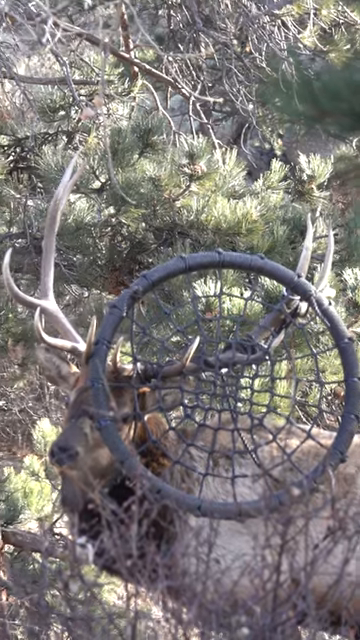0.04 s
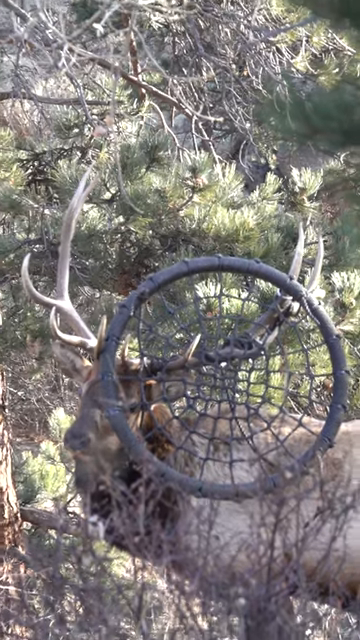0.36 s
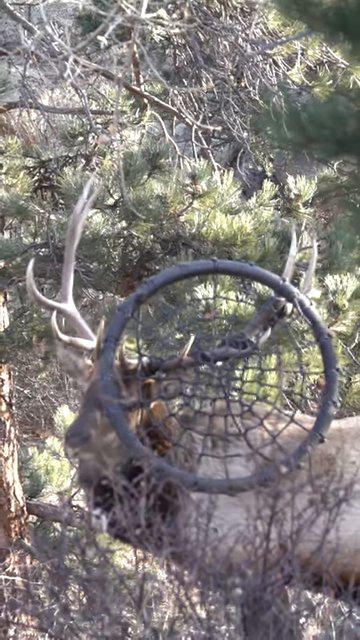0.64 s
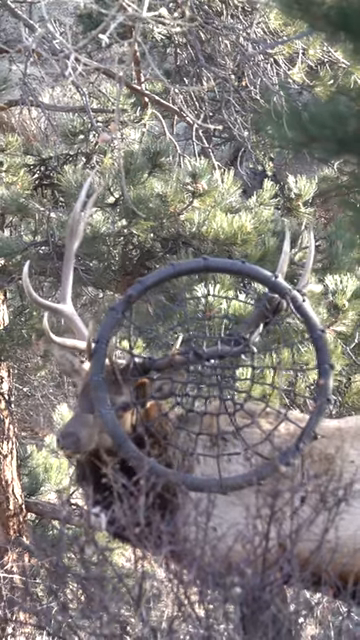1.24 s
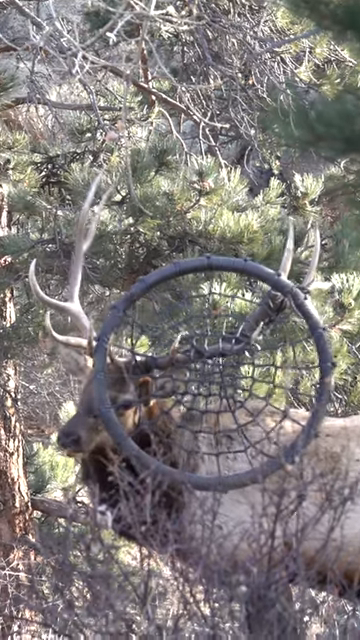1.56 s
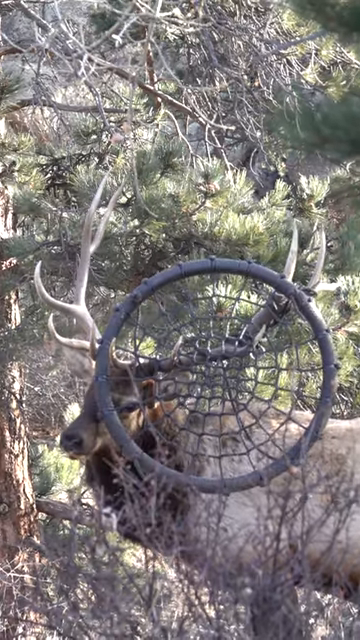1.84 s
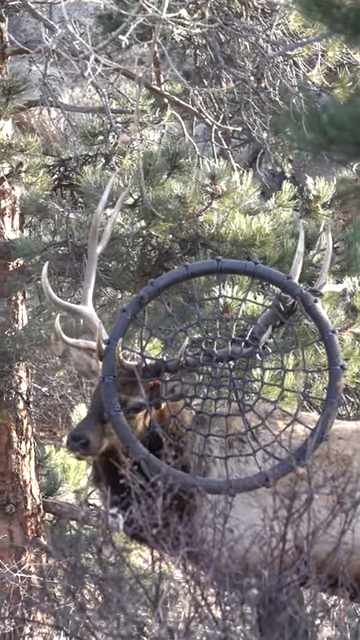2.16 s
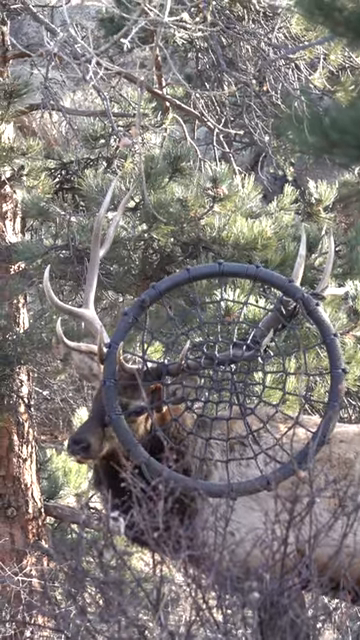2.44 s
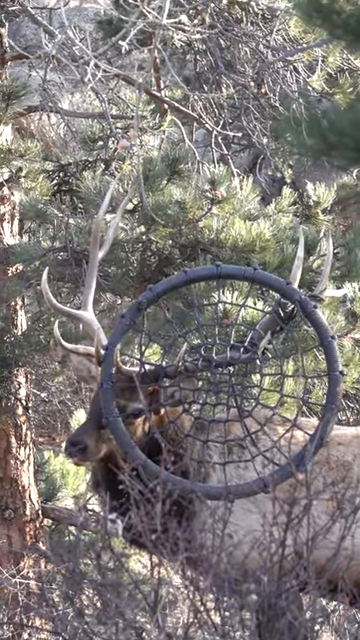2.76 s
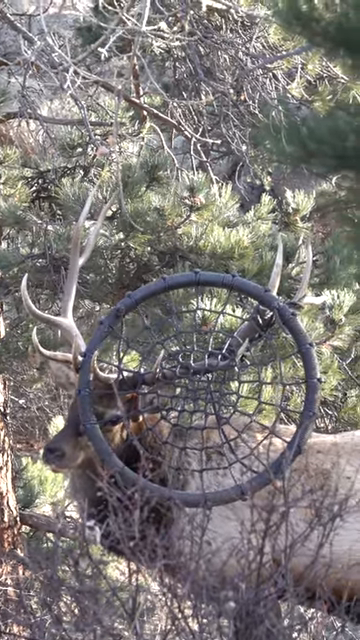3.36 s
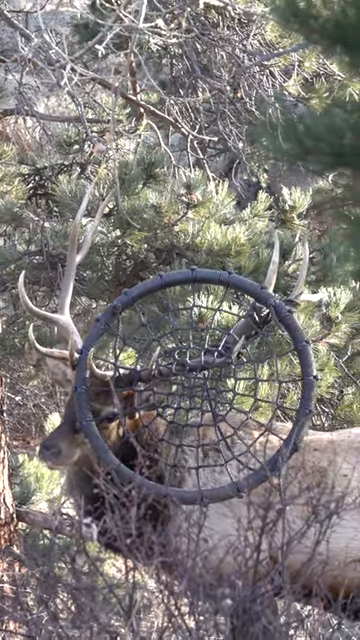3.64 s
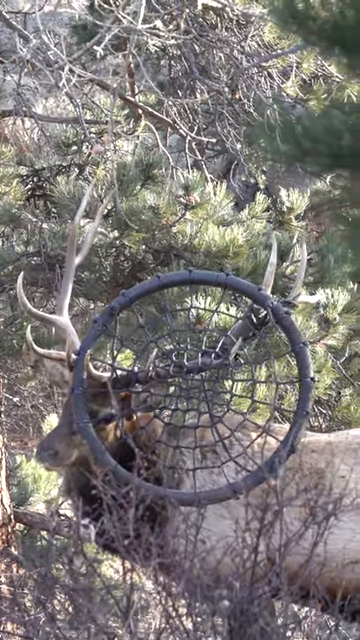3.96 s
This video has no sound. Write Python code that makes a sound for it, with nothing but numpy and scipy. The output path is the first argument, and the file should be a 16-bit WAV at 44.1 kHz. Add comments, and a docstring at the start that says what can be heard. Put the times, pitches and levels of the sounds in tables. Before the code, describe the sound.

Far-off propeller plane droning and sinking in pitch, under close camera handling bumps.

```python
"""Distant plane over a pine wood

A propeller plane drones far away. Its pitch sinks as it passes (the Doppler effect),
and its roar swells in the moving air. Close by, a hand-held camera rumbles and takes
soft low bumps, its casing ticks, a finger slides on it, and its zoom motor whirrs for
the first half second. Small birds chip very faintly over a thin, even hiss."""
import sys
import numpy as np
from scipy import signal
from scipy.fft import rfft, irfft
from scipy.io import wavfile
from scipy.ndimage import uniform_filter1d, map_coordinates

SR = 44100
rng = np.random.default_rng(int(sys.argv[2]) if len(sys.argv) > 2 else 0)


def waveform_to_disk(signal):
    """Save audio, clipped to [-1, 1], as 16-bit WAV at the path in sys.argv[1]."""
    frames = np.transpose(np.atleast_2d(signal))
    scaled = np.clip(frames, -1, 1) * 32767
    samples = np.round(scaled).astype(np.int16)
    wavfile.write(sys.argv[1], SR, samples)


N = 4 * SR
OPPOSITE = np.array([[1], [-1]])  # adds to the left ear, takes from the right


def gain(db):
    """Turn decibels into a number to multiply by."""
    return 10 ** (np.asarray(db) / 20)


def curve(rows):
    """Join points in time with straight lines."""
    return np.interp(np.arange(N) / SR, *np.array(rows).T)


def noise(colour):
    """Noise of strength 1; its colour says how strong the low and high pitches are."""
    hz, db = np.array(colour).T
    all_hz = np.arange(N // 2 + 1) * SR / N
    shape_db = np.interp(np.log(np.maximum(all_hz, 1)), np.log(hz), db)
    sound = irfft(rfft(rng.standard_normal(N)) * gain(shape_db), N)
    return sound / sound.std()


def stereo_noise(colour, width):
    """Noise that differs more between the ears as width grows."""
    return noise(colour) + width * noise(colour) * OPPOSITE


def pan(db):
    """Make the left ear db louder than the right."""
    return gain(db * OPPOSITE / 2)


def wander(hz):
    """A smooth random wobble of about 1 either way; more hz makes it faster."""
    span = int(SR / hz)
    wobble = uniform_filter1d(rng.standard_normal(N), span, mode="wrap")
    wobble = uniform_filter1d(wobble, span // 2, mode="wrap")
    return (wobble - wobble.mean()) / wobble.std()


# Colour of the hiss: pitch_hz, level_db
HISS_COLOUR = [(500, 6), (1200, 6), (2000, 4.5), (3000, 2.8), (4500, 1.6), (7000, -.8), (11000, -2.2)]
# Loudness of the hiss: time_s, level_db
HISS_LEVEL = [(0, -75.5), (.55, -78), (.58, -80), (.67, -76.5), (.75, -75), (1.0, -74), (4, -74)]
def hiss():
    """A thin hiss that dips briefly after the zoom stops."""
    return stereo_noise(HISS_COLOUR, width=0.64) * gain(curve(HISS_LEVEL))


# Bird calls: start_s, length_s, start_hz, end_hz, level_db
BIRD_CHIPS = [(.08, .09, 3550, 2950, -78), (.2, .06, 3250, 3600, -79), (1.78, .04, 4850, 4550, -79),
              (2.71, .05, 4850, 4650, -79), (3.09, .04, 4550, 4350, -79), (3.47, .04, 4250, 4350, -82),
              (3.82, .12, 3450, 2750, -82)]
def birds(t):
    """Far birds give thin, slightly rough chips that glide in pitch."""
    out, waver_hz = np.zeros(N), 89 * wander(300)
    for start_s, length_s, start_hz, end_hz, level_db in BIRD_CHIPS:
        progress = np.clip((t - start_s) / length_s, 0, 1)
        pitch_hz = start_hz + (end_hz - start_hz) * progress + waver_hz
        whistle = np.sin(2 * np.pi * np.cumsum(pitch_hz) / SR)
        out += gain(level_db) * np.sin(np.pi * progress) * whistle
    return out


# Colour of the whirr: pitch_hz, level_db
ZOOM_COLOUR = [(900, -20), (1350, -4), (1650, 5), (1950, -4), (2300, -1), (2800, -8), (4900, -13),
               (5600, -1), (5900, -5), (6250, 0), (6800, -20), (8000, -18), (8500, -8), (9300, -22)]
def zoom_motor(t, level_db=-78, stop_s=0.553):
    """The small motor whirrs faintly, then stops dead."""
    return stereo_noise(ZOOM_COLOUR, width=0.99) * gain(level_db) * (t < stop_s)


# Colour of the rubbing: pitch_hz, level_db
SLIDE_COLOUR = [(1000, -17), (1500, -3), (1750, -5.5), (1950, 3), (2150, -8), (2500, -18.5), (3100, -11.5),
                (4000, -27), (5400, -17), (7000, -25), (11000, -33)]
def finger_slide(t, level_db=-70.5, peak_s=1.614, spread_s=0.095):
    """A finger rubs over the casing with a brief, grainy sound."""
    swell = np.exp(-0.5 * ((t - peak_s) / spread_s) ** 2)
    return stereo_noise(SLIDE_COLOUR, width=0.73) * gain(level_db + 1.6 * wander(50)) * swell


# Colour of the casing's ring: pitch_hz, level_db
RING_COLOUR = [(500, 5), (1000, -1.5), (1450, 4.5), (1750, -0.5), (2050, -0.5), (2600, -13.5),
               (3300, -22.5), (4500, -42), (11000, -43)]
# Colour of the crack on top: pitch_hz, level_db
CRACK_COLOUR = [(1500, -14), (2800, -2), (3250, 2.5), (3800, -5.5), (6000, -5), (8000, -7.5), (11000, -8.5)]
# Ticks: start_s, level_db, left_over_right_db, decay_s, treble_db
TICKS = [(.347, -55, -12, 0.0039, -6), (0.352, -54, -1, .007, -5.5), (0.54, -58.5, -4, 0.0012, 2),
         (1.094, -47.5, 1, 0.0025, -7.5), (1.165, -51, -8, 0.0042, -12), (1.568, -49.5, -3, 0.0041, -10),
         (1.631, -56, -15, 0.0025, -10.5), (1.872, -43, -5, 0.0023, -11.5),
         (2.053, -44.5, -6.5, 0.0033, -1), (2.369, -49.5, 1.5, 0.0038, -7), (3.239, -61.5, -2, 0.022, 10),
         (3.548, -65, -16, 0.0054, -6), (3.78, -60, -18, 0.0018, -11)]
def casing_ticks(t, rise_s=0.0028, trim_db=-1.5, crack_db=-8.5):
    """The plastic casing ticks: a short, dry ring with a bright crack."""
    ring, crack = stereo_noise(RING_COLOUR, width=0.53), stereo_noise(CRACK_COLOUR, width=1)
    out = np.zeros((2, N))
    for start_s, level_db, pan_db, decay_s, treble_db in TICKS:
        near = (t >= start_s) & (t < start_s + 0.2)
        age_s = t[near] - start_s
        rise = np.minimum(age_s / rise_s, 1)
        fade = np.exp(-np.maximum(age_s - rise_s, 0) / decay_s)
        tick = ring[:, near] + gain(crack_db + treble_db) * crack[:, near]
        out[:, near] += pan(pan_db) * gain(level_db + trim_db) * rise * fade * tick
    return out


# Colour of the rumble: pitch_hz, level_db
RUMBLE_COLOUR = [(10, -14.5), (25, 2.5), (45, 11), (80, 0), (130, 3.5), (200, -7.5), (400, -44.5),
                 (1500, -100)]
def rumble(level_db=-44, flicker_db=3):
    """Air and hands on the microphone make a low, uneven rumble."""
    return stereo_noise(RUMBLE_COLOUR, width=0.16) * gain(level_db + flicker_db * wander(7.1))


# Soft knocks on the camera: peak_s, level_db, pitch_hz
BUMPS = [(.108, -25.5, 63), (0.376, -17, 135), (.388, -16.5, 76), (0.407, -18.5, 110), (0.428, -23.5, 60),
         (0.473, -21, 75.6), (0.483, -13, 122.7), (0.522, -26.5, 57), (0.543, -26, 108), (.715, -27, 65),
         (1.366, -24.5, 90), (1.541, -28, 55), (1.585, -28, 70), (1.686, -32.5, 75), (1.792, -25.5, 62),
         (1.856, -24.5, 108), (1.887, -31.5, 50.7), (1.999, -26, 71), (2.211, -23.5, 65), (2.243, -32, 65),
         (2.401, -35, 71.4), (2.518, -32, 54.7), (2.645, -23.5, 89), (3.011, -26.5, 55), (3.029, -23, 40.6),
         (3.065, -25, 60.5), (3.194, -19.5, 78), (3.222, -17.5, 95), (3.242, -17.5, 121), (3.257, -15, 89),
         (3.274, -27, 70), (3.3, -21.5, 115), (3.529, -26, 57), (3.849, -35, 60)]
def bumps(t, trim_db=0.5, spread_cycles=0.43):
    """Each bump shoves and twists the pair of microphones for a swing or two."""
    out = np.zeros((2, N))
    for peak_s, level_db, pitch_hz in BUMPS:
        near = np.abs(t - peak_s) < 0.1
        cycles = (t[near] - peak_s) * pitch_hz
        shove = np.cos(2 * np.pi * cycles)
        direction = np.sign(rng.random() - 0.5)
        twist = 0.32 * direction * np.sin(2 * np.pi * cycles * 1.37)
        swell = np.exp(-0.5 * (cycles / spread_cycles) ** 2)
        out[:, near] += gain(level_db + trim_db) * swell * (shove + twist * OPPOSITE)
    return out


# The strongest propeller tone, sinking as the plane passes: time_s, pitch_hz
PLANE_PITCH = [(0, 475.5), (.5, 464.5), (1, 455.8), (1.5, 446), (2, 438), (2.5, 431), (3, 422.3),
               (3.5, 417), (4, 410.5)]
def doppler(sound):
    """Play a sound ever more slowly, so that it sinks with the plane's pitch."""
    pitch_hz = curve(PLANE_PITCH)
    position = np.cumsum(pitch_hz / pitch_hz.mean())
    return np.array([map_coordinates(ear, [position], mode="grid-wrap") for ear in sound])


# Colour of the rush, midway through the pass: pitch_hz, level_db
RUSH_COLOUR = [(200, -35), (450, -1.5), (520, -4), (570, -0.5), (635, -6), (695, -3.5), (760, -10.5),
               (830, -8.5), (1000, -20.5), (1200, -23), (1450, -36.5), (2500, -56.5), (6000, -92)]
# Loudness of the rush: time_s, level_db
RUSH_LEVEL = [(0, -58.5), (.25, -62.5), (.6, -60), (.8, -57), (.97, -51.5), (1.15, -53), (1.4, -57),
              (1.6, -58.5), (2.03, -58), (2.27, -54), (2.5, -55.5), (2.87, -52), (3.15, -50.5), (3.45, -54),
              (3.8, -49.5), (4, -53)]
def air_rush(trim_db=1, flicker_db=1.5):
    """Air flowing over the plane makes a wide rush that flickers in the wind."""
    rush = doppler(stereo_noise(RUSH_COLOUR, width=0.49))
    return rush * gain(curve(RUSH_LEVEL) + trim_db + flicker_db * wander(7.2))


# Colour of the roar midway, with dips from the echo off the ground: pitch_hz, level_db
ROAR_COLOUR = [(60, -27.5), (125, -1.5), (170, -8.5), (218, 6), (245, 0), (283, -6.5), (335, 0), (365, -5),
               (398, -9.5), (445, -5.5), (480, -14.5), (530, -28.5), (900, -58.5), (3000, -110)]
# Loudness of the roar: time_s, level_db
ROAR_LEVEL = [(0, -43), (.22, -43.5), (.5, -43), (.75, -37), (.94, -32), (1.15, -38.5), (1.4, -42.5),
              (1.7, -43), (2.05, -47), (2.26, -37.5), (2.5, -41.5), (2.72, -34.5), (2.89, -31.5),
              (3.0, -39.5), (3.14, -33.5), (3.45, -39), (3.65, -35.5), (4, -40.5)]
def exhaust_roar(trim_db=1.3, flicker_db=2):
    """The exhaust makes a low roar that swells and flickers in the wind."""
    roar = doppler(stereo_noise(ROAR_COLOUR, width=0.07))
    return roar * gain(curve(ROAR_LEVEL) + trim_db + flicker_db * wander(7.2))


# Tones in the drone: multiple_of_blade_rate, relative_level_db
BLADE_TONES = [(1, -17.5), (2, -18.5), (3, -13.5), (4, -0.5), (5, -24.5), (6, -34)]
# Loudness of the drone as the air lets it through: time_s, level_db
DRONE_LEVEL = [(0, -53.5), (.07, -51.5), (.14, -46.5), (.32, -59.5), (.43, -38), (.56, -51), (.7, -37.5),
               (.82, -49), (.89, -33.5), (1.15, -40), (1.4, -44), (1.5, -60), (1.57, -43), (2.0, -46.5),
               (2.15, -47), (2.25, -36.5), (2.42, -39.5), (2.5, -47), (2.6, -41), (3.0, -40), (3.27, -48.5),
               (3.41, -40.5), (3.62, -41.5), (3.85, -52), (4, -46)]
def propeller(trim_db=-0.5, flutter=0.47, flutter_hz=20, width=0.2):
    """The beating blades make a stack of tones, each fluttering on its way through the air."""
    blade_hz = curve(PLANE_PITCH) / 4  # the strongest tone is four times the blade rate
    phase = 2 * np.pi * np.cumsum(blade_hz) / SR
    out = np.zeros((2, N))
    for multiple, level_db in BLADE_TONES:
        # complex numbers (1j) let the air shake both loudness and timing
        air = 1 + flutter * (wander(flutter_hz) + 1j * wander(flutter_hz))
        ears = 1 + 1j * width * wander(flutter_hz) * OPPOSITE
        tone = np.exp(1j * (multiple * phase + 2 * np.pi * rng.random()))
        out += gain(level_db) * np.real(air * ears * tone)
    return np.sqrt(2) * out * gain(curve(DRONE_LEVEL) + trim_db)


def scene():
    """Add up the far plane, the nearby camera, the birds and the hiss."""
    t = np.arange(N) / SR
    plane = (propeller() + exhaust_roar() + air_rush()) * pan(0.5)
    camera = rumble() + bumps(t) + casing_ticks(t) + zoom_motor(t) + finger_slide(t)
    return plane + camera + birds(t) + hiss()


def record(dry, top_hz=11000):
    """Cut away the highest treble with a steep filter."""
    low_pass = signal.ellip(8, 0.1, 50, top_hz, fs=SR, output="sos")
    return signal.sosfiltfilt(low_pass, dry, padlen=2000)


dry = scene()
out = record(dry)
waveform_to_disk(out)
```